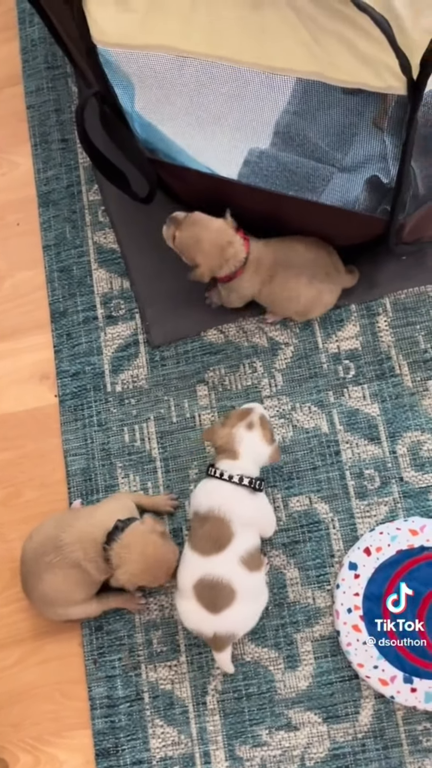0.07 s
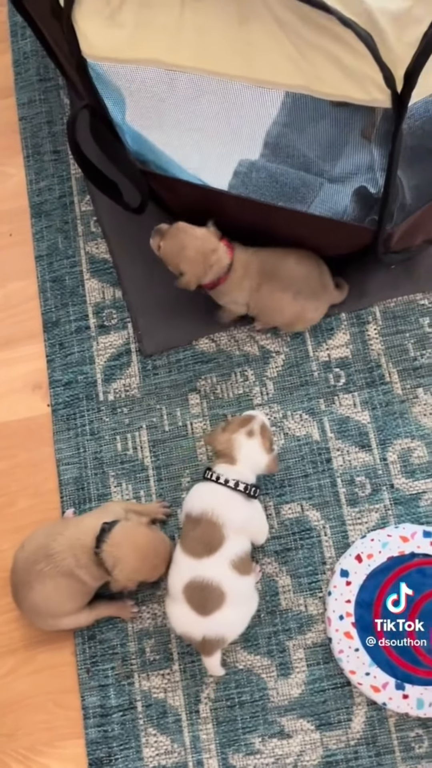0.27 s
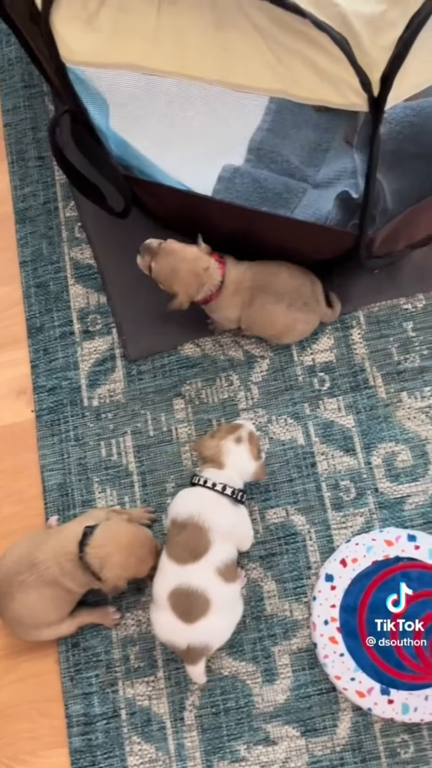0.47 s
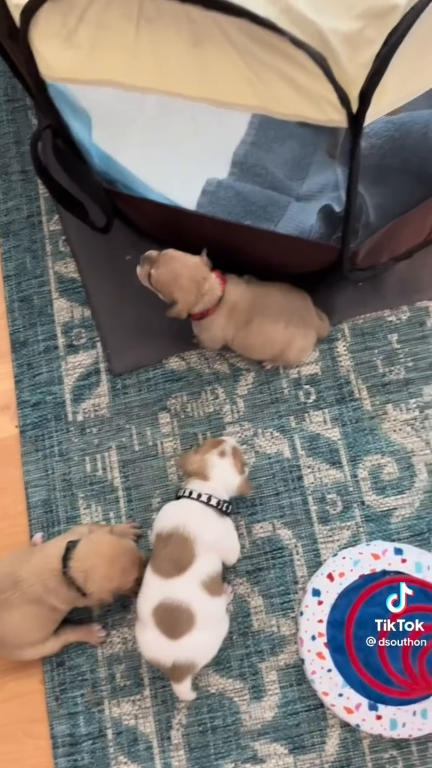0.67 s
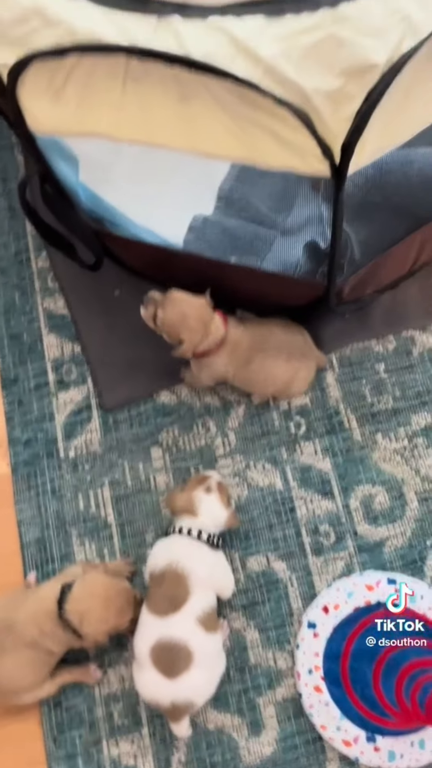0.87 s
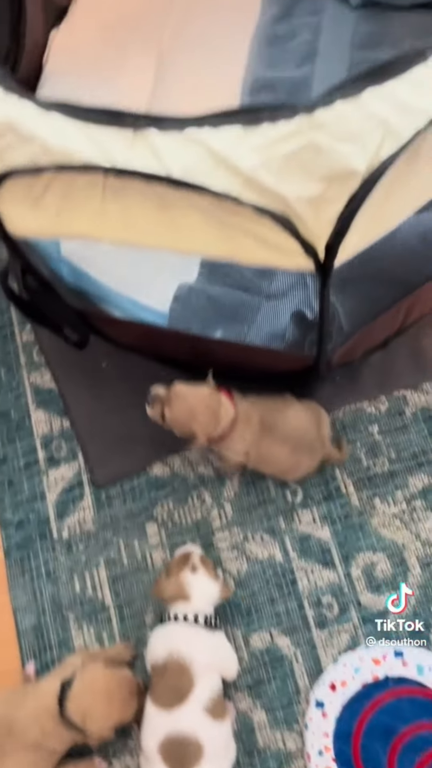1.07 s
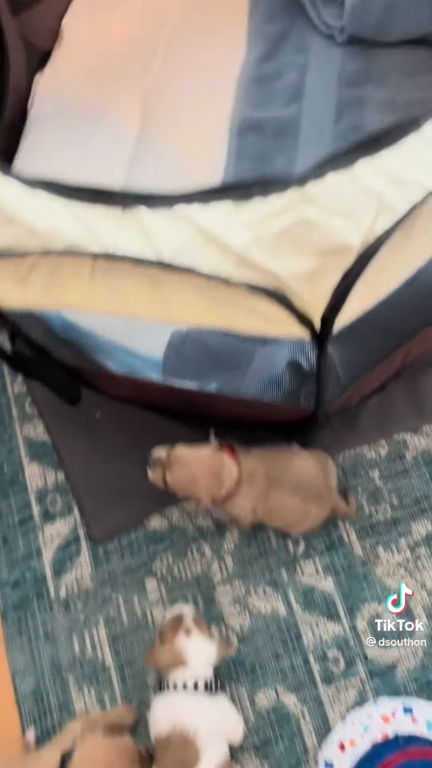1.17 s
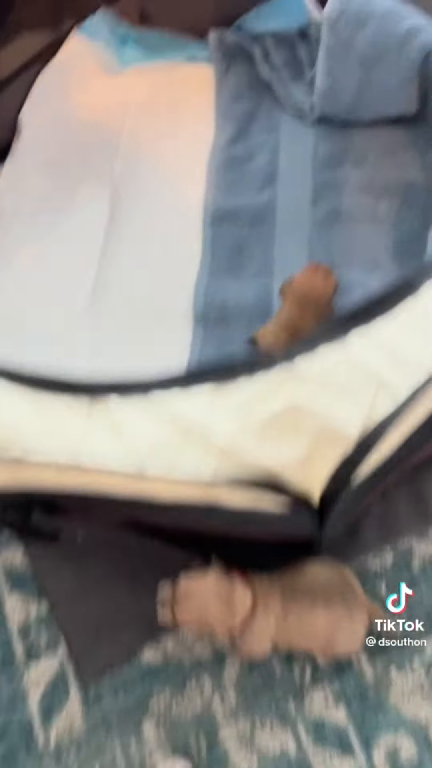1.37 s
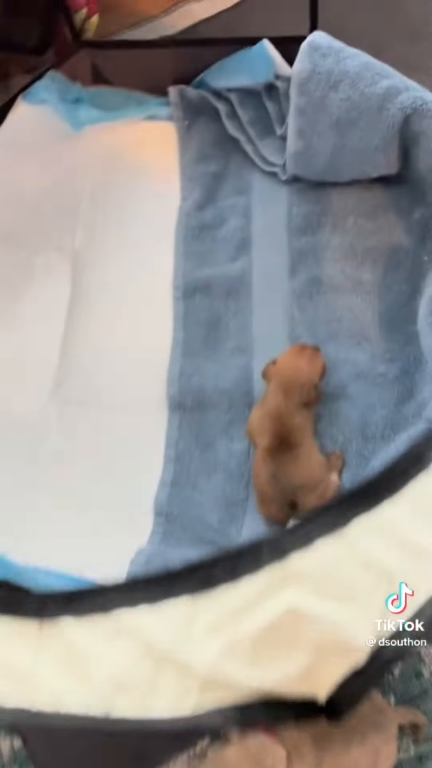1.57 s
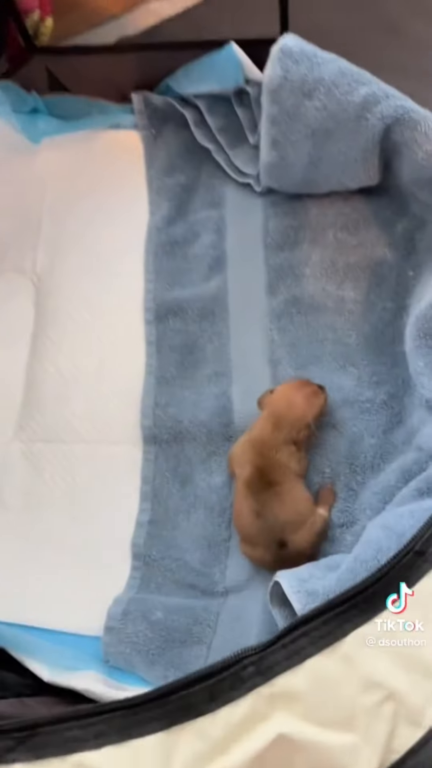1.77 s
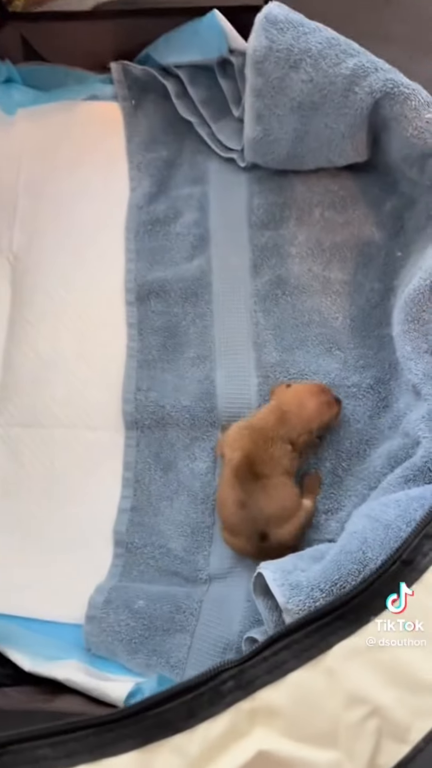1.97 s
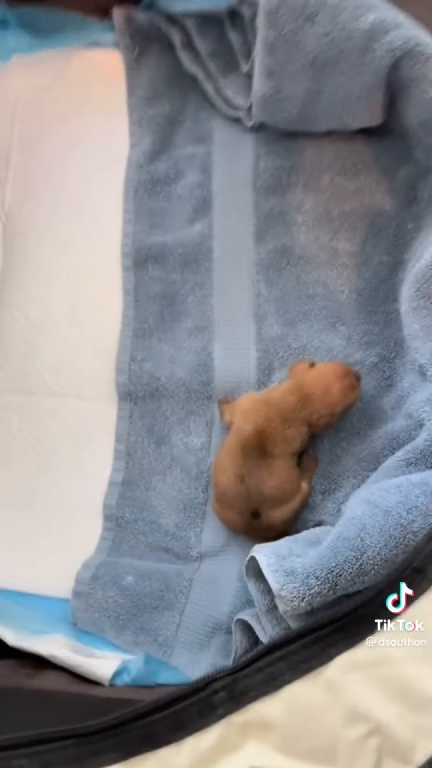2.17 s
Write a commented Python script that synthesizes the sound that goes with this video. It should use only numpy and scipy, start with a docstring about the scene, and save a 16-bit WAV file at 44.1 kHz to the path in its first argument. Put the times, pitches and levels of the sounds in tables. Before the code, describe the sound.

Three tiny puppies cry close to a handheld stereo microphone in a carpeted room; one gives loud rising yelps that break into rasps and thin whistles, while two others whine steadily, overlapping.

```python
"""The loudest of three very young puppies yelps: a rise, a rasp of slow uneven pulses, then thin whistles.
Two others whine in clean, mostly rising tones, close to a handheld microphone pair in a carpeted room.
Tones are sums of wandering harmonics under a colour curve; the rasp is pulses ringing a moving mouth.
Sparse reflections make the room; under it lies shaped noise, nearly the same at both ports."""
import sys
import numpy as np
from scipy import signal
from scipy.fft import rfft, irfft
from scipy.io import wavfile
from scipy.ndimage import uniform_filter1d

SR = 44100
rng = np.random.default_rng(int(sys.argv[2]) if len(sys.argv) > 2 else 0)


def generate_wav(signal):
    """Clip the signal to [-1, 1] and save it as 16-bit WAV at the path in sys.argv[1]."""
    frames = np.transpose(np.atleast_2d(signal))
    scaled = np.clip(frames, -1, 1) * 32767
    pcm = np.round(scaled).astype(np.int16)
    wavfile.write(sys.argv[1], SR, pcm)


def gain_from_db(level_db):
    """Convert decibel levels to linear amplitude factors (20 dB per decade)."""
    decades = np.asarray(level_db, float) / 20
    return 10 ** decades


N = 97020
EDGE_S = 0.007  # fade at the ends of a cry
JITTER = 0.0015  # rms fraction of pitch

# Overall colour of the high whines and the whistles: throat, mouth and recording chain, with the
# recorder's dip near 7 kHz. Each row: frequency in Hz, gain in dB.
HIGH_COLOUR = [(500, -18.5), (900, -0.6), (1700, 7), (2500, 8), (3600, -5.5), (4700, 5), (5800, 1.5),
               (7200, -27), (10000, -20.5), (13000, -17.5)]


def evened(x):
    """Scales to unit rms."""
    return x / np.sqrt(np.mean(x ** 2) + 1e-20)


def read(points, hz):
    """Interpolates a curve over log frequency."""
    f, value = np.transpose(points)
    return np.interp(np.log1p(hz), np.log1p(f), value)


def add(mix, start_s, sound):
    """Adds a sound in place, cut at the end of the mix."""
    part = mix[max(round(start_s * SR), 0):][:len(sound)]
    part += sound[:len(part)]


def wobble(shape, size):
    """Slow random drift of unit rms: noise averaged twice over `size` samples."""
    noise = rng.standard_normal(shape)
    return evened(uniform_filter1d(uniform_filter1d(noise, size), size))


def yelper():
    """Rises, rasps and thin whistles; whistles share the high whiner's colour, the last may be another puppy."""
    # Rises. Each row: time in s, pitch in Hz, second harmonic in dB.
    rises = [
        [(.185, 830, -44), (.203, 906, -26.5), (.232, 1134, -10.5)],
        [(.692, 770, -41), (.73, 906, -15.5), (.752, 942, -14), (.792, 1116, -18)],
        [(1.28, 732.2, -40), (1.36, 1010, -19), (1.392, 1132, -16.5)],
    ]
    # Rasps. Each row: time in s, pulse rate in Hz, level in dB, mouth resonance in Hz.
    rasps = [
        [(.231, 320, -17.5, 1965), (.25, 333.2, -11.5, 2047), (.268, 350.4, -17.5, 2083),
         (.305, 334, -24.5, 2340)],
        [(.789, 237.8, -18.5, 1994), (.828, 233.3, -19, 2140), (.848, 174.3, -21, 2110),
         (.868, 102.6, -19, 2140), (.905, 123.2, -32, 2150)],
        [(1.385, 244.4, -15.5, 2070), (1.41, 249.8, -21, 2215), (1.47, 199.1, -22.5, 2360),
         (1.51, 199, -43, 2390)],
    ]
    # Whistles. Each row: time in s, pitch in Hz, fundamental in dB.
    whistles = [
        [(.274, 1912, -14.5), (.3, 1881, -13), (.35, 1830, -24), (.5, 1629, -33), (.522, 1570, -31.5)],
        [(.88, 1569, -32), (.905, 1406, -34.5), (.96, 1397, -37), (.99, 1315, -40.5)],
        [(.972, 1583, -25), (1.0, 1664, -36), (1.07, 1706, -33.5), (1.088, 1570, -55)],
        [(1.46, 1445, -36.5), (1.55, 1500, -41.5), (1.628, 1620, -43.5)],
        [(1.92, 1020, -41.5), (1.98, 1140, -36.5), (2.05, 1070, -47.5)],
    ]
    # Brightness at the loudest moment, one per rise: dB per octave above the second harmonic.
    rise_bright = [1, 0.54, 6.7]
    # Brightness at the loudest moment, one per whistle: dB per octave above the fundamental.
    whistle_bright = [-15.5, -2, -4.5, -12, -20.5]
    # Brightness, one per rasp: dB per octave above the mouth resonance.
    rasp_bright = [2.5, 1.5, 0.5]
    # Pulse rate jitter, one per rasp: rms fraction.
    rasp_jitter = [.02, .025, .12]
    # Gain of the odd harmonics, one per rise: dB.
    rise_odd_db = [-12.5, -17, -9.5]
    # Gain of the even harmonics, one per whistle: dB.
    whistle_even_db = [6.5, 10, 8.5, 18, 18.5]
    # Overall colour of the rises: throat, mouth and recording chain, with the recorder's dip near 7 kHz.
    # Each row: frequency in Hz, gain in dB.
    rise_colour = [(1100, -25), (1600, -19), (2050, -6), (3100, -24), (4200, -24.5), (5400, -22),
                   (6200, -21.5), (7200, -52.5), (9000, -53.5), (13000, -60)]
    breathy = 0.035
    out = np.zeros(N)
    for rows, bright, odd_db in zip(rises, rise_bright, rise_odd_db):
        add(out, *cry(rows, rise_colour, bright, JITTER, noise=breathy, other_db=odd_db, order=2))
    for rows, jitter, bright in zip(rasps, rasp_jitter, rasp_bright):
        add(out, *rasp(rows, jitter, bright))
    for rows, bright, even_db in zip(whistles, whistle_bright, whistle_even_db):
        add(out, *cry(rows, HIGH_COLOUR, bright, jitter=0.003, shimmer=0.15, noise=breathy, other_db=even_db))
    return out


def rasp(rows, jitter, bright):
    """Slow uneven slaps of the folds, each with a puff of air, ring the resonances of a moving mouth."""
    # What each pulse rings. Each row: multiple of the mouth resonance, width in Hz, relative level in dB.
    rings = [(1, 298, 2.5), (2.12, 220, -18), (2.5, 230, -12), (4.4, 1400, -27.5)]
    shimmer, air_level = 0.15, 0.08
    s, rate_hz, db, mouth_hz = np.transpose(rows)
    t = np.arange(s[0], s[-1], 1 / SR)
    rate_hz, db, mouth_hz = (np.interp(t, s, column) for column in (rate_hz, db, mouth_hz))
    drift = wobble(SR // 2, size=150)[:len(t)]
    size = wobble(SR // 2, size=80)[:len(t)]
    air = rng.standard_normal(len(t))

    cycles = 0.7 + np.cumsum(rate_hz * (1 + jitter * drift)) / SR
    slaps = np.diff(cycles // 1, prepend=0) * (1 + shimmer * size)
    puffs = air_level * np.exp(-2 * (cycles % 1)) * air
    drive = slaps + puffs

    phase = 2 * np.pi * np.cumsum(mouth_hz) / SR
    out = np.zeros(len(t))
    for multiple, width_hz, ring_db in rings:
        # shift the resonance to 0 Hz, filter, shift back: it then follows the mouth
        turn = np.exp(1j * multiple * phase)
        r = np.exp(-np.pi * width_hz / SR)
        onset = signal.lfilter([1 - r * r], [1, -r * r], drive / turn)
        ring = (turn * signal.lfilter([1], [1, -r], onset)).real
        out += gain_from_db(ring_db + bright * np.log2(multiple)) * ring
    # a small head radiates no bass
    out = signal.sosfilt(signal.butter(4, 1000, "high", fs=SR, output="sos"), out)
    out = out / np.sqrt(uniform_filter1d(out ** 2, size=900, mode="reflect") + 1e-12)
    return s[0], out * gain_from_db(db) * np.clip((s[-1] - t) / EDGE_S, 0, 1)


def cry(rows, colour, bright, jitter, shimmer=0.14, noise=0., other_db=0., order=1):
    """Vocal fold harmonics fringed with breath noise, under a colour curve; dB is that of `order`."""
    effort_bright = 0.55  # dB per octave lost with each dB below the loudest moment
    wander_db, breath_db = 3, -33
    s, hz, db = np.transpose(rows)
    t = np.arange(s[0], s[-1], 1 / SR)
    hz = uniform_filter1d(np.interp(t, s, hz), size=600, mode="nearest")
    db = np.interp(t, s, db)
    draws = SR // 2
    cycles = np.cumsum(hz * (1 + jitter * wobble(draws, size=120)[:len(t)])) / SR
    k = np.arange(1, 60)[:, None]

    base_hz = hz * order
    octaves = np.log2(np.maximum(k * hz / base_hz, 1))
    tilt_db = (bright + effort_bright * (db - db.max())) * octaves
    gain = gain_from_db(read(colour, k * hz) - read(colour, base_hz) + tilt_db)
    # every other harmonic is weaker or stronger
    gain *= (k * hz < 15000) * gain_from_db(other_db * ((k - order) % 2))
    # upper harmonics swell and fade slowly, each on its own, as the head moves
    wander = wobble((59, draws), size=3000)[:, :len(t)]
    gain *= gain_from_db(wander_db * wander * (k > order))

    # breath blurs the upper harmonics more
    puffs = evened(wobble((59, draws), size=60)[:, :len(t)])
    fringe = (gain_from_db(breath_db) * np.sqrt(k) + noise * (k - order) ** 2) * puffs
    blurred = (1 + fringe) / np.sqrt(1 + (fringe ** 2).mean(1, keepdims=True))
    tones = np.cos(2 * np.pi * k * cycles + k ** 2)
    sound = (gain * blurred * tones).sum(0) * np.sqrt(2)

    # no fade where the cry runs past either end of the scene
    since_start = (t - s[0]) + (s[0] < 0.003)
    until_end = s[-1] - t + (s[-1] > 2.195)
    edge = np.clip(np.minimum(since_start, until_end) / EDGE_S, 0, 1)
    flutter = 1 + shimmer * wobble(draws, size=150)[:len(t)]
    return s[0], sound * np.sin(edge * np.pi / 2) ** 2 * gain_from_db(db) * flutter


def whiner(cries, brights, colour):
    """Clean cries, one per breath; a dull whine is breathier."""
    breathy = 0.006  # per dB per octave of dullness
    out = np.zeros(N)
    for rows, bright in zip(cries, brights):
        add(out, *cry(rows, colour, bright, JITTER, noise=breathy * max(-bright, 0)))
    return out


def low_whiner():
    """Low whines, each ending in a quick fall of pitch."""
    # One table per cry. Each row: time in s, pitch in Hz, fundamental in dB.
    cries = [
        [(0.0, 821.3, -35.5), (0.172, 851.3, -36)],
        [(0.375, 561.0, -64.5), (0.493, 760.6, -41.5), (0.65, 751, -42.5)],
        [(0.85, 452, -56.5), (0.92, 737, -47), (1.098, 791.6, -41.5)],
        [(1.325, 554, -48), (1.385, 758, -42.5), (1.552, 789, -39.5)],
        [(1.78, 568.0, -45.5), (1.84, 746, -44.5), (2.045, 740, -41.5)],
    ]
    # Brightness at the loudest moment, one per cry: dB per octave above the fundamental.
    brights = [-7, -4.5, -4, -4, -1.5]
    # Overall colour of these cries: throat, mouth and recording chain, with the recorder's dip near 7 kHz.
    # Each row: frequency in Hz, gain in dB.
    colour = [(500, -4), (2300, 0), (3100, -17), (6000, -26), (7200, -50), (10000, -36), (13000, -45)]
    fall_s, fall_fraction, fall_db = 0.022, 0.3, -10
    falling = []
    for rows in cries:
        s, hz, db = rows[-1]
        falling.append(list(rows) + [(s + fall_s, hz * (1 - fall_fraction), db + fall_db)])
    return whiner(falling, brights, colour)


def high_whiner():
    """Higher whines, without the final fall."""
    # One table per cry. Each row: time in s, pitch in Hz, fundamental in dB.
    cries = [
        [(0, 925, -41.5), (.096, 1021, -42), (.135, 1000, -51)],
        [(.285, 649, -63.5), (.36, 833, -48), (.45, 952, -45.5), (.58, 965, -49.5)],
        [(.73, 592, -55.5), (.8, 797, -46), (1.045, 941, -46)],
        [(1.185, 495, -62.5), (1.23, 741, -48.5), (1.295, 882, -42), (1.4, 990.7, -43), (1.5, 1081, -48.5)],
        [(1.642, 481.3, -56.5), (1.692, 727, -43), (1.76, 897, -35.5), (1.935, 981.5, -40), (1.975, 960, -94.5)],
        [(2.148, 573, -54.5), (2.168, 588, -54.5), (2.2, 792, -44.5)],
    ]
    # Brightness at the loudest moment, one per cry: dB per octave above the fundamental.
    brights = [-11, -8, -5, 1.5, 2, -1.5]
    return whiner(cries, brights, HIGH_COLOUR)


def room(x):
    """Sparse reflections of random sign, each band dying at its own speed."""
    # Decay time. Each row: frequency in Hz, time to fall 60 dB in s.
    t60 = [(500, .38), (6000, .42)]
    same = 0.6  # correlation of the ports
    taps = np.zeros((2, SR // 2))
    # one reflection in every 20 samples
    at = np.arange(200, SR // 2 - 20, 20) + rng.integers(0, 20, (2, (SR // 2 - 201) // 20))
    np.put_along_axis(taps, at, rng.choice([-1., 1.], at.shape), 1)
    taps[1] = same * taps[0] + np.sqrt(1 - same ** 2) * taps[1]
    hz, t, z = signal.stft(taps, SR, nperseg=256)
    decay = gain_from_db(-60 * t / read(t60, hz)[:, None])
    tail = signal.istft(z * decay, SR, nperseg=256)[1]
    return signal.fftconvolve(x, tail / np.linalg.norm(tail[0]), axes=1)[:, :N]


def hush():
    """Low room noise, nearly the same at both ports."""
    # Noise spectrum. Each row: frequency in Hz, relative density in dB per Hz.
    spectrum = [(25, -41), (60, -15.5), (800, -13), (5000, -20), (7300, -69), (11000, -29.5)]
    # Swell as the microphone is moved. Each row: time in s, gain in dB over the base level.
    swell = [(0, 3.5), (1.15, 12.5), (2.2, 11)]
    base_db, same = -65.5, 0.97
    hz = np.fft.rfftfreq(N, 1 / SR)
    a, b = rng.standard_normal((2, N))
    pair = rfft([a, same * a + np.sqrt(1 - same ** 2) * b])
    pair = irfft(pair * gain_from_db(read(spectrum, hz)), N)
    return evened(pair) * gain_from_db(base_db + np.interp(np.arange(N) / SR, *np.transpose(swell)))


def scene():
    """Three panned voices, their room and the hush."""
    # The microphone turns. Each row: time in s, left minus right in dB.
    pan = [(0, 1.3), (.9, 0), (1.3, -2.6), (2.2, -.6)]
    turn_db = np.interp(np.arange(N) / SR, *np.transpose(pan))
    sides = np.array([[0.5], [-0.5]])
    high_pan_db, room_db = 0.9, -12
    near = (yelper() + low_whiner()) * gain_from_db(sides * turn_db)
    near = near + high_whiner() * gain_from_db(sides * (high_pan_db + turn_db))
    return near + gain_from_db(room_db) * room(near) + hush()


def top_cut(x):
    """Nothing passes above the cut-off."""
    return signal.sosfilt(signal.butter(12, 13140, fs=SR, output="sos"), x)


def record(dry):
    """The two ports differ in phase by frequency; a steep low-pass limits the band."""
    # Port phase. Each row: frequency in Hz, lead of the left port in radians.
    lead = [(0, 0), (3790, .7), (5500, .5), (6550, 3), (9820, 7.5), (12700, 8)]
    edge_hz = 13100
    hz = np.fft.rfftfreq(2 * N, 1 / SR)
    turn = np.exp(0.5j * read(lead, hz) * np.array([[1], [-1]]))
    low_pass = 1 / (1 + (hz / edge_hz) ** 60)
    ports = irfft(rfft(dry, 2 * N) * turn * low_pass, 2 * N)[:, :N]
    return top_cut(ports)


dry = scene()
out = record(dry)
generate_wav(out)
```